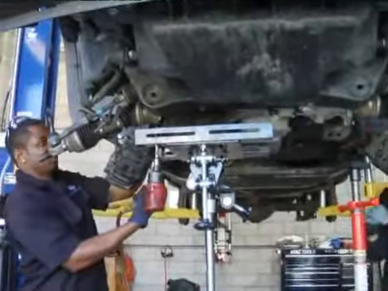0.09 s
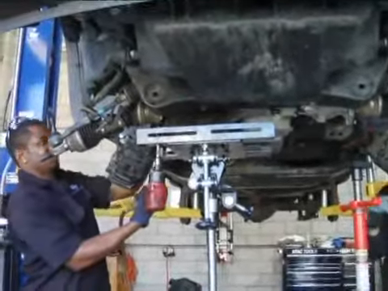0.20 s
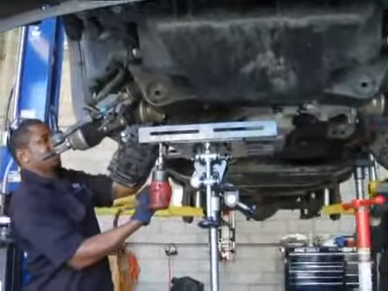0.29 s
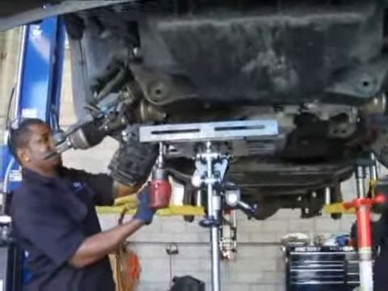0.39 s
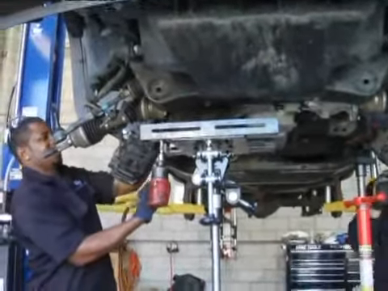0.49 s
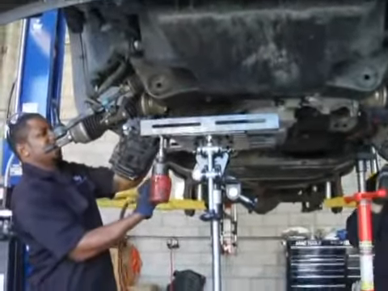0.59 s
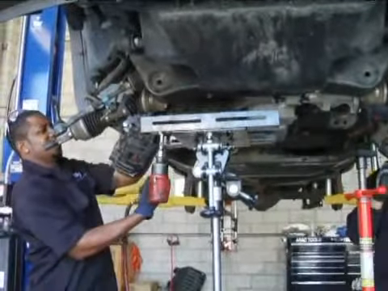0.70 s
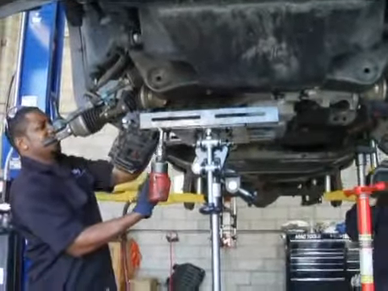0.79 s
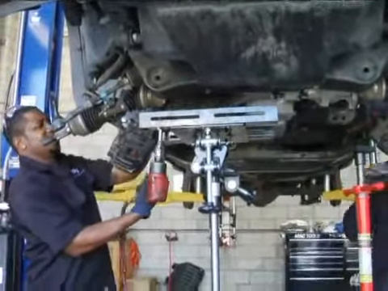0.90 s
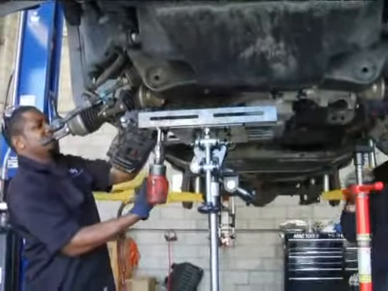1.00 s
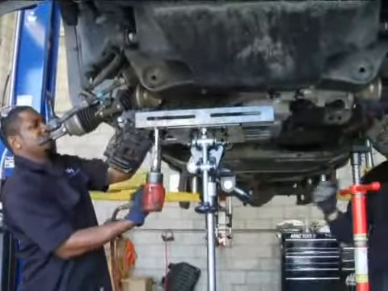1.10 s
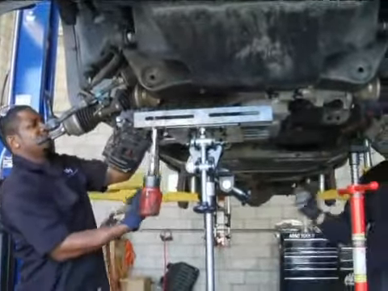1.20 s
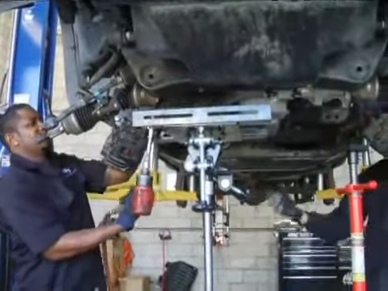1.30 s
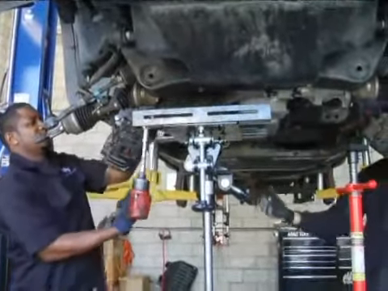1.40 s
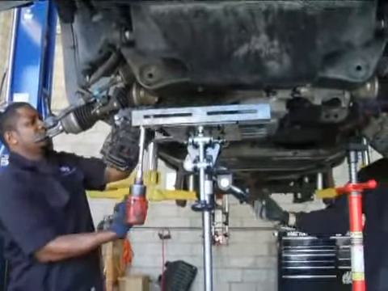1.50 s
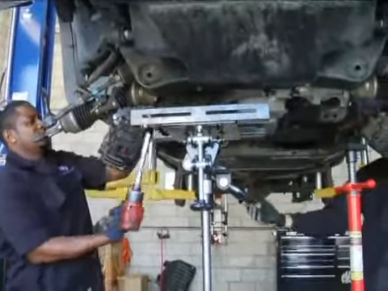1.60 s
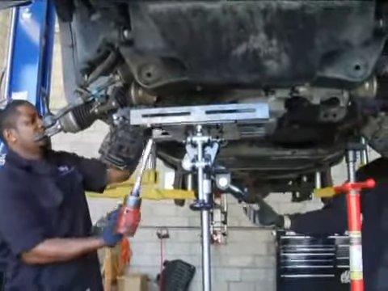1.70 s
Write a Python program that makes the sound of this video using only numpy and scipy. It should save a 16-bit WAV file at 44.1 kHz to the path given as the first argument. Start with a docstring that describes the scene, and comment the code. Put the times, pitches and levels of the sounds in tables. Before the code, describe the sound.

An air wrench sputters, spins free and winds down in an echoing workshop, with steel knocks

```python
"""An air impact wrench works under a vehicle in a workshop, over a low hum and steady room noise.
First comes a stalled, chuffing burst: hissing, roaring noise for the air and short pops for its slugs.
Then it spins freely: a stack of tones and ringing puffs follow the vanes as they whine up and coast down.
As it slows and afterwards, tool and stand knock, made of rattling noise and ringing steel modes.
Last, the loose socket clinks twice in clear decaying tones; the hall echoes every sound of the tool."""
import sys
import numpy as np
from scipy import signal
from scipy.fft import rfft, irfft
from scipy.io import wavfile
from scipy.ndimage import uniform_filter1d

SR = 44100
rng = np.random.default_rng(int(sys.argv[2]) if len(sys.argv) > 2 else 0)


def generate_wav(signal):
    """Clip the signal to [-1, 1] and save it as 16-bit WAV at the path in sys.argv[1]."""
    frames = np.transpose(np.atleast_2d(signal))
    scaled = np.clip(frames, -1, 1) * 32767
    pcm = np.round(scaled).astype(np.int16)
    wavfile.write(sys.argv[1], SR, pcm)


N = 74970  # length in samples: 1.7 s


def amp(db):
    """Turn decibels into a plain gain."""
    return 10 ** (np.asarray(db) / 20)


def evened(x):
    """Scale a signal to an average (RMS) level of 1."""
    return x / np.sqrt(np.mean(x ** 2) + 1e-20)


def read(points, hz):
    """Read a table of values over pitch, with straight lines on a logarithmic pitch scale."""
    f, value = np.transpose(points)
    return np.interp(np.log(hz + 1), np.log(f + 1), value)


def along(rows, column):
    """A table column as a curve over every sample."""
    rows = np.array(rows)
    return np.interp(np.arange(N) / SR, rows[:, 0], rows[:, column])


def during(rows):
    """One inside the time span of a table, zero outside, with 7.5 ms ramps at the ends."""
    t = np.arange(N) / SR
    return np.clip(np.minimum(t - rows[0][0], rows[-1][0] - t) / 0.0075, 0, 1)


def add(mix, s, sound):
    """Add a sound to the mix at a time in seconds, cutting what runs past the end."""
    part = mix[round(s * SR):][:len(sound)]
    part += sound[:len(part)]


def resonate(x, hz, width):
    """A fixed resonance of gain 1: it rings at one pitch, and the narrower the longer."""
    r = np.exp(-np.pi * width / SR)
    return 2 * signal.lfilter([1 - r], [1, -r * np.exp(2j * np.pi * hz / SR)], x).real


def noise(spectrum, patchy_db, flicker_db):
    """Random short-time spectra with drifting patches and a flicker shared by all pitches."""
    frames = N // 128 + 5
    real, imaginary, patches = rng.standard_normal((frames, 257, 3)).T
    # Smooth over neighbouring pitches, then over time.
    patches = uniform_filter1d(patches, size=6, axis=0)
    patches = evened(uniform_filter1d(patches, size=10, axis=1))
    flicker = rng.standard_normal(frames)
    z = (real + 1j * imaginary) * amp(patchy_db * patches + flicker_db * flicker)
    x = signal.istft(z, nperseg=512, noverlap=384)[1][:N]
    colour = amp(read(spectrum, np.fft.rfftfreq(N, 1 / SR)))
    return evened(irfft(rfft(x) * colour, N))


# The rush of exhaust air. Each row: time in seconds, hiss level in dB, low roar level in dB.
AIR_RUSH = [(.205, -73, -51), (.24, -36, -36.5), (.251, -21.5, -32), (.3, -23.5, -30), (.378, -26, -25),
            (.41, -32, -33.5), (.505, -40, -30.5), (.53, -24, -26), (.58, -32.5, -27.5),
            (.65, -30.5, -39.5), (.68, -41.5, -37), (.9, -48, -35), (1.02, -51, -33), (1.16, -67, -46)]
# Colour of the hiss. Each row: pitch in Hz, relative strength per Hz in dB.
HISS_COLOUR = [(880, -3.5), (1500, -3), (1970, -7), (4320, -13), (6780, -7), (10300, -11), (11900, -11.5),
               (12700, -21), (13000, -54)]
# Colour of the roar. Each row: pitch in Hz, relative strength per Hz in dB.
ROAR_COLOUR = [(24, -37), (40, -7), (163, -4), (240, 4), (314, -0.5), (519, 1.5), (605, -5), (667, -2),
               (4000, -14), (5200, -23.5)]


def air():
    """Turbulent exhaust: bright hiss over a lumpy low roar."""
    # One extra point each keeps the hiss out of the bass and the roar out of the treble.
    hiss = noise([(300, -45)] + HISS_COLOUR, patchy_db=2.5, flicker_db=1.0)
    hiss = amp(along(AIR_RUSH, column=1)) * hiss
    roar = noise(ROAR_COLOUR + [(8000, -61)], patchy_db=1.5, flicker_db=3.0)
    roar = amp(along(AIR_RUSH, column=2)) * roar
    return during(AIR_RUSH) * (hiss + roar)


# Exhaust pops. Each row: start in seconds, level in dB before the shared lift, time scale in ms.
AIR_POPS = [(.2195, -26, 2.2), (.2485, -10, 2.8), (.2515, -10, 7), (.2573, -6, 2), (.262, -13, 1.8),
            (.268, -12, 2.6), (.2728, -9, 2.2), (.2765, -14, 2.2), (.28, -14, 1.6), (.302, -16, 5),
            (.3095, -13, 1.8), (.3135, -17, 3.5), (.3175, -14, 1.8), (.325, -14, 1.8), (.3417, -8, 2),
            (.348, -15, 1.8), (.3775, -16, 2), (.5165, -20, 3), (.5257, -11, 2.6), (.529, -13, 5),
            (.537, -11, 2.4), (.5395, -15, 4), (.5415, -11, 2.2), (.545, -11, 2), (.5525, -14, 1.8)]
POP_LIFT_DB = 1.5


def pops():
    """Single slugs of air: a sharp push, a broader pull and a small rebound."""
    out = np.zeros(N)
    for s, db, ms in AIR_POPS:
        u = np.arange(0, 2.5, 1000 / (SR * ms))  # time counted in time scales
        swing = np.sin(2 * np.pi * u ** .75)  # the power makes each swing slower than the last
        shape = swing * np.tanh(u / .08) * np.exp(-u ** 2)
        add(out, s, amp(db + POP_LIFT_DB) * shape)
    return out


# The free spin. Each row: time in seconds, vane rate in Hz, exhaust ring level in dB, tone level in dB.
FREE_SPIN = [(.53, 189.8, -50, -29), (.55, 263.3, -37, -27), (.57, 345, -32, -25), (.598, 453.6, -44, -20),
             (.62, 499, -39, -26.5), (.642, 538.6, -69, -22.5), (.656, 522.9, -33, -25),
             (.686, 436, -32.5, -22.5), (.712, 369.4, -29, -27.5), (.74, 306.1, -42.5, -37),
             (.77, 253.3, -30, -36.5), (.8, 209.7, -37, -36), (.86, 158.6, -41.5, -36),
             (.905, 129.1, -33.5, -46), (.96, 102.9, -40, -41), (1.07, 64.3, -32.5, -45)]
# Levels in dB of the vane tone and its overtones, relative to the tone level of the spin.
OVERTONE_LEVELS = [0, -9, -13]
# Exhaust resonances. Each row: pitch in Hz, width setting in Hz (doubled in each of two passes),
# relative level in dB.
EXHAUST_MODES = [(237, 85, -7), (654, 33, 11), (1146, 210, -1.5), (1384, 80, 16), (1630, 60, 5)]
# Vanes ticking while the motor coasts. Each row: time in seconds, level in dB.
VANE_TICKS = [(.72, -60), (.76, -52), (.9, -49), (.985, -43.5), (1.01, -84)]
VANE_JITTER, VANE_UNEVEN_DB = .011, 1.0  # share of the vane rate; spread of puff strength
TICK_HZ, TICK_WIDTH_HZ, TICK_UNEVEN_DB = 9200, 800, 4.0


def motor():
    """The vane rate sings as a stack of clean tones; each puff also rings the exhaust and, while coasting, ticks."""
    wobble = evened(uniform_filter1d(rng.standard_normal(N), size=150))
    rate = along(FREE_SPIN, column=1) * (1 + VANE_JITTER * wobble)
    cycles = np.cumsum(rate) / SR
    at = np.flatnonzero(np.diff(np.floor(cycles)))  # one puff per whole cycle
    chance = rng.standard_normal((N, 2))[:len(at)]
    puffs, ticks = np.zeros((2, N))
    puffs[at] = amp(VANE_UNEVEN_DB * chance[:, 0])
    ticks[at] = amp(TICK_UNEVEN_DB * chance[:, 1])

    tones, whine = np.zeros((2, N))
    for k, db in enumerate(OVERTONE_LEVELS):
        level = amp(along(FREE_SPIN, column=3) + db) * np.sqrt(2)
        tones += level * np.cos(2 * np.pi * (k + 1) * cycles)
    for k, (hz, width, db) in enumerate(EXHAUST_MODES):
        ring = resonate(resonate(puffs, hz, 2 * width), hz, 2 * width)
        whine += (-1) ** k * amp(db) * ring  # neighbouring resonances have opposite signs
    whine = amp(along(FREE_SPIN, column=2)) * evened(whine)
    tick = resonate(resonate(ticks, TICK_HZ, TICK_WIDTH_HZ), TICK_HZ, TICK_WIDTH_HZ)
    tick = amp(along(VANE_TICKS, column=1)) * evened(tick)
    return during(FREE_SPIN) * (tones + whine + tick)


# Knocks of tool and stand. Each row: start in seconds, level in dB, centre pitch in Hz,
# spread in octaves, rise time in ms, time to fade by 60 dB in seconds.
STEEL_KNOCKS = [(.814, -36.5, 6100, 0.82, 2, 0.091), (0.958, -42, 3050, 0.06, 3, 0.6),
                (1.020, -30.5, 3070, 0.77, 1.7, 0.12), (1.185, -26, 2750, 0.2, 2.5, 0.086),
                (1.187, -20, 1300, 1.2, 2.5, 0.025), (1.2, -32.5, 10100, 0.24, 0.52, 0.11),
                (1.203, -38.5, 5300, 0.29, 1.2, 0.21), (1.202, -26.5, 860, 0.53, 3, 0.16),
                (1.203, -33.5, 2990, 0.36, 2.2, 0.18), (1.226, -32.5, 1360, 0.45, 1.1, 0.11),
                (1.2, -38, 280, 0.65, 8, 0.7), (1.446, -42, 3380, 0.097, 9, 0.22),
                (1.365, -41.5, 7000, 1.2, 1.9, 0.046), (1.437, -36, 1450, .45, 18, 0.27),
                (1.453, -35, 4100, 1.33, 3.9, 0.14), (1.46, -26.5, 1600, 0.55, 8, 0.18),
                (1.467, -26.5, 9000, 0.042, 6.4, 0.037), (1.482, -34, 680, 0.066, 6, 0.28),
                (1.45, -41, 310, 0.55, 13, 0.7)]
# Pitches in Hz at which the steel of tool and stand rings.
STEEL_MODES = [686, 790, 950, 1362, 1620, 1770, 2180, 2600, 2810, 3030, 3420]
RING_SHARE = .45  # share of the power that goes to the ringing modes
SKIRT_DB = -34  # faint wide-band part of every rattle


def knocks():
    """Each contact rings the steel modes near its pitch, over a dense rattle of the same colour."""
    out, t = np.zeros(N), np.arange(8192) / SR
    f = np.fft.rfftfreq(8192, 1 / SR) + 1  # plus 1 Hz avoids the logarithm of zero
    modes = np.array(STEEL_MODES)[:, None]
    for s, db, hz, octaves, rise_ms, t60 in STEEL_KNOCKS:
        colour = np.exp(-.5 * (np.log2(f / hz) / octaves) ** 2)
        colour = colour + amp(SKIRT_DB) * f / (f + 600)
        rattle = evened(irfft(rfft(rng.standard_normal(len(t))) * colour))
        near = np.exp(-.5 * (np.log2(modes / hz) / octaves) ** 2)
        start_phase = rng.random(modes.shape)
        ring = (near * np.sin(2 * np.pi * (modes * t + start_phase))).sum(0)
        # Even out the ring, but leave it weak if no mode lies near.
        ring = ring * np.sqrt(2 / max((near ** 2).sum(), 1))
        contact = np.sqrt(1 - RING_SHARE) * rattle + np.sqrt(RING_SHARE) * ring
        rise = np.minimum(t * 1000 / rise_ms, 1)
        add(out, s, amp(db - 60 * t / t60) * rise * contact)
    return out


# Clinks of the socket. Each row: start in seconds, level in dB, then upper mode and click in dB against it.
SOCKET_CLINKS = [(1.5165, -32.5, -8, 2.5), (1.6215, -33, -10.5, -4)]
# Modes of the socket: low, high and its close twin. Each row: pitch in Hz, time to fade by 60 dB in seconds.
SOCKET_MODES = [(3424, .24), (8904, .3), (8960, .15)]


def clinks():
    """The loose socket rings clear: one low mode and a close, beating pair, with a noisy click."""
    out, t = np.zeros(N), np.arange(12000) / SR
    for s, db, upper_db, click_db in SOCKET_CLINKS:
        low, high, twin = (amp(-60 * t / t60) * np.sin(2 * np.pi * hz * t) for hz, t60 in SOCKET_MODES)
        # Differences of noise samples sound bright.
        click = amp(click_db - 60 * t / 0.031) * np.diff(rng.standard_normal(len(t) + 1))
        ring = low + amp(upper_db) * (high + 0.16 * twin)
        rise = np.minimum(t / 0.0015, 1)
        add(out, s, amp(db) * (rise * ring + click))
    return out


# Echo of the hall. Each row: pitch in Hz, time to fade by 60 dB in seconds.
HALL_FADE = [(100, 0.24), (500, 0.97), (2000, 0.95), (6000, 1), (12000, 0.33)]


def hall(x):
    """Sparse taps of random sign, each band dying at its own speed."""
    taps = np.zeros(SR)
    at = np.arange(300, SR - 20, 20)  # the first echo comes after about 7 ms
    taps[at + rng.integers(0, 20, len(at))] = rng.choice([-1., 1.], len(at))
    hz, t, z = signal.stft(taps, SR, nperseg=256)
    fade = amp(-60 * t / read(HALL_FADE, hz)[:, None])
    tail = signal.istft(z * fade, SR, nperseg=256)[1]
    return signal.fftconvolve(x, tail / np.linalg.norm(tail))[:N]


# Colour of the room noise. Each row: pitch in Hz, relative strength per Hz in dB.
ROOM_COLOUR = [(15, -78), (25, 0.5), (187, -9.5), (237, -15), (333, -17), (1780, -24), (2800, -26.5),
               (3600, -37.5), (6200, -36.5), (12000, -48.5), (13000, -49)]
# The room noise falls as an earlier echo dies away. Each row: time in seconds, dB above the room level.
ROOM_FADING = [(0, 17.5), (.07, 10), (.12, 7.5), (1.7, 3)]
ROOM_DB, HUM_DB = -50, -48
HUM_HZ, HUM_WIDTH_HZ = 185, 25


def workshop():
    """Room noise that settles, and a wavering hum made of noise through a narrow resonance."""
    hum = rng.standard_normal(N)
    hum = resonate(resonate(hum, HUM_HZ, HUM_WIDTH_HZ), HUM_HZ, HUM_WIDTH_HZ)
    level = amp(ROOM_DB + along(ROOM_FADING, column=1))
    room = level * noise(ROOM_COLOUR, patchy_db=-2.0, flicker_db=2.0)
    return room + amp(HUM_DB) * evened(hum)


# Faint blurred side layer. Each row: pitch in Hz, gain in dB from the middle to the side signal.
SIDE_BLUR = [(200, -45), (4000, -29)]
HALL_DB = -9.5


def scene():
    """Mix tool, echo and workshop; add a very quiet phase-scrambled side copy, staying almost mono."""
    tool = air() + pops() + motor() + knocks() + clinks()
    mid = tool + amp(HALL_DB) * hall(tool) + workshop()
    hz, _, z = signal.stft(mid, SR, nperseg=512)
    scramble = np.exp(2j * np.pi * rng.random(z.shape))
    z = z * amp(read(SIDE_BLUR, hz))[:, None] * scramble
    side = signal.istft(z, SR, nperseg=512)[1][:N]
    return np.array([mid + side, mid - side])


TOP_HZ, TOP_DB = 11060, -12  # where the highest treble begins; its gain when quietest
LOW_CUT_HZ, EDGE_HZ = 58.4, 13000


def record(dry):
    """Quiet passages sound duller above 11 kHz; then come a bass cut and the band limit."""
    treble_filter = signal.firwin(127, TOP_HZ, pass_zero=False, fs=SR)
    top = signal.oaconvolve(dry, treble_filter[None], "same")
    power = abs(uniform_filter1d((top ** 2).mean(0), size=600))
    level_db = 10 * np.log10(power + 1e-12)
    # The highest treble is untouched above -46 dB and turned down the most below -58 dB.
    dullness = np.clip((-46 - level_db) / 12, 0, 1)
    top_dulled = dry - top * (1 - amp(TOP_DB * dullness))
    bass_cut = signal.butter(2, LOW_CUT_HZ, "high", fs=SR)
    without_bass = signal.lfilter(*bass_cut, top_dulled)
    band_limit = signal.firwin(511, EDGE_HZ, window=("kaiser", 9), fs=SR)
    return signal.oaconvolve(without_bass, band_limit[None], "same")


dry = scene()
out = record(dry)
generate_wav(out)
```